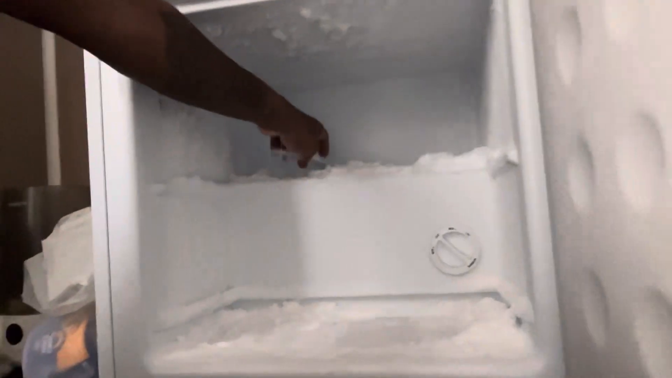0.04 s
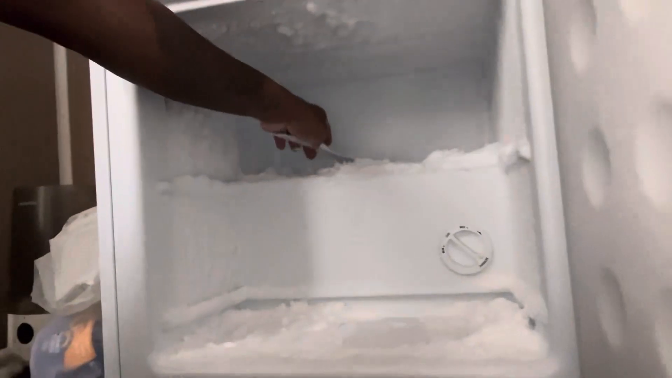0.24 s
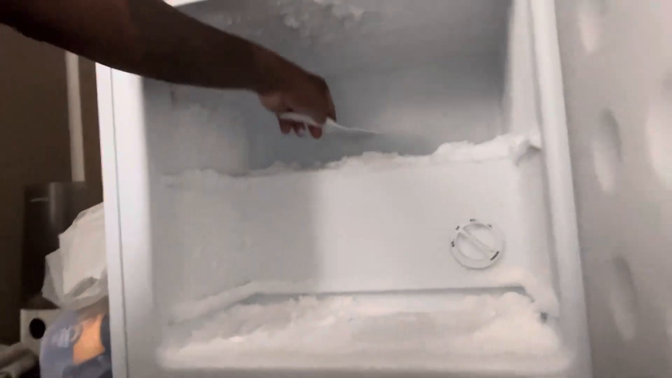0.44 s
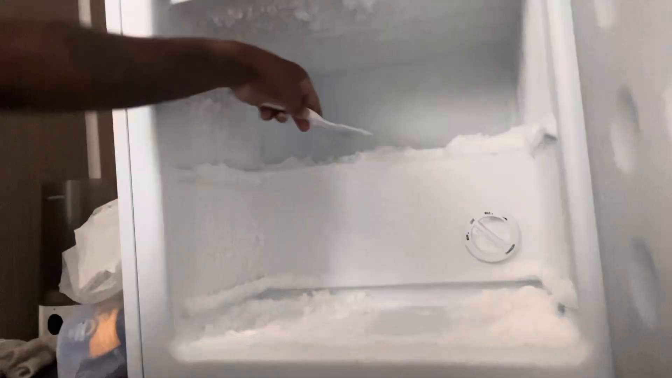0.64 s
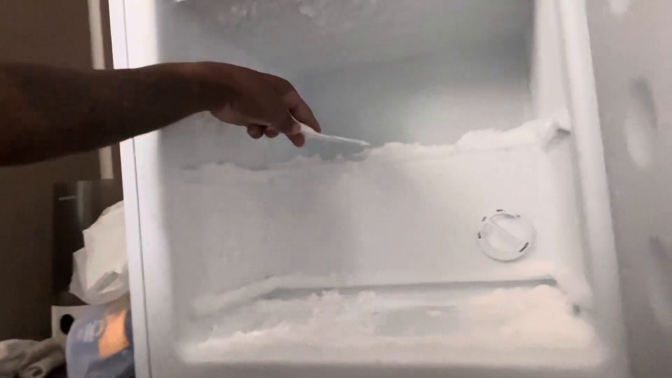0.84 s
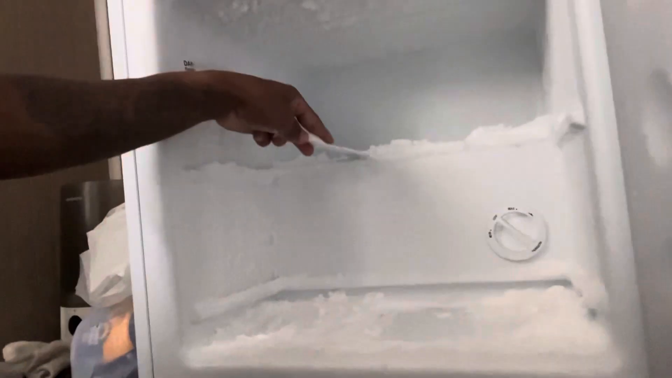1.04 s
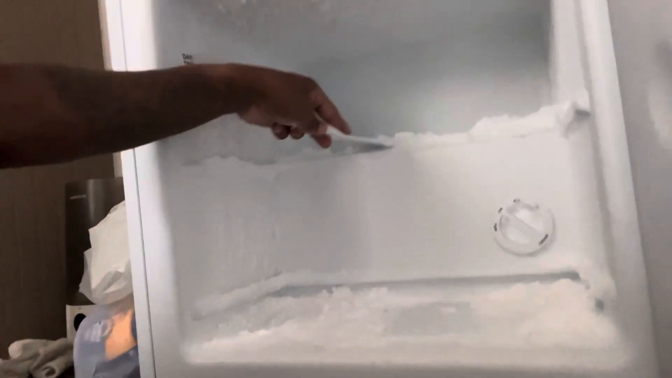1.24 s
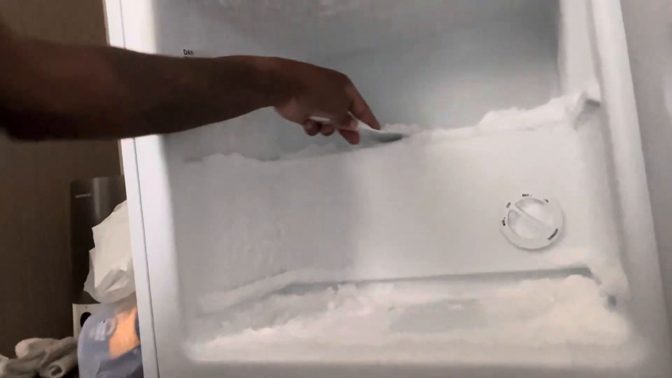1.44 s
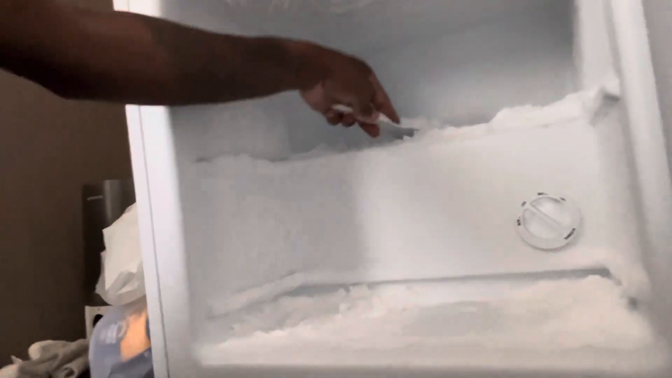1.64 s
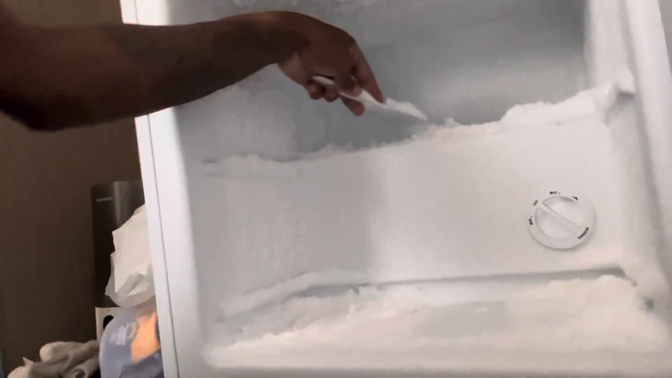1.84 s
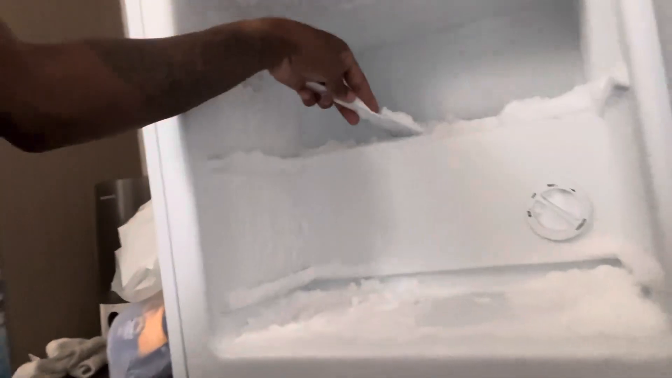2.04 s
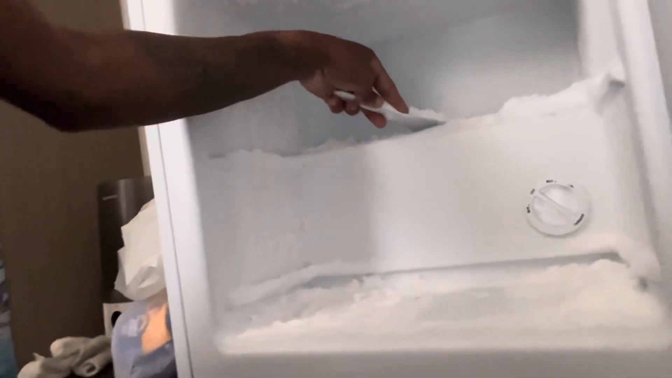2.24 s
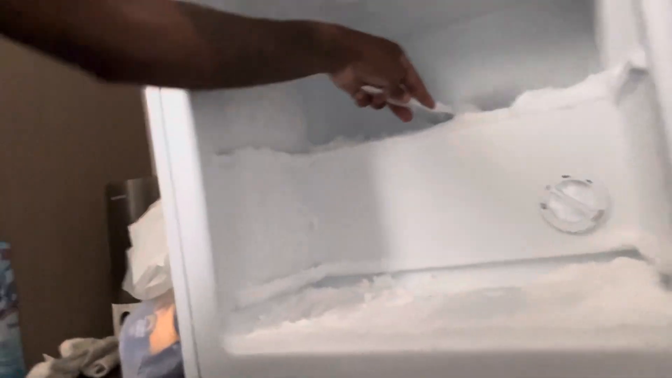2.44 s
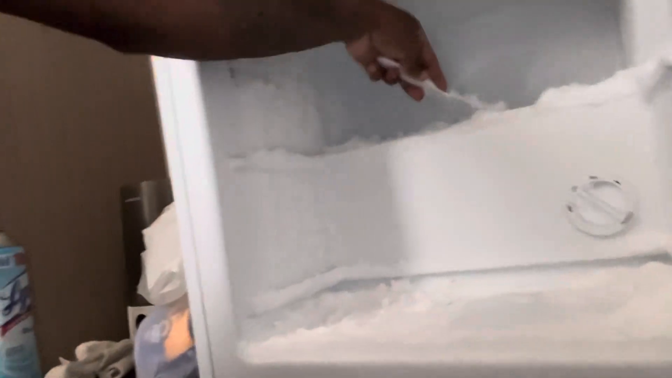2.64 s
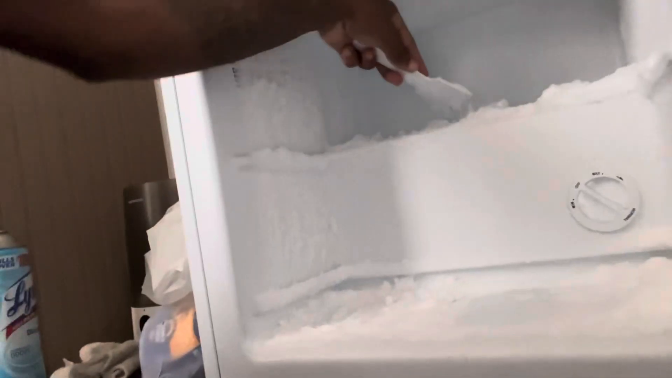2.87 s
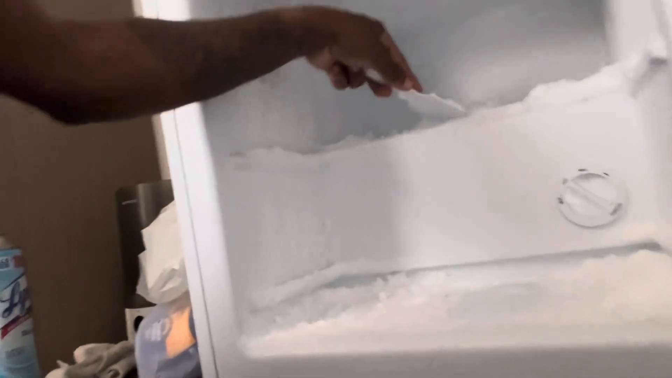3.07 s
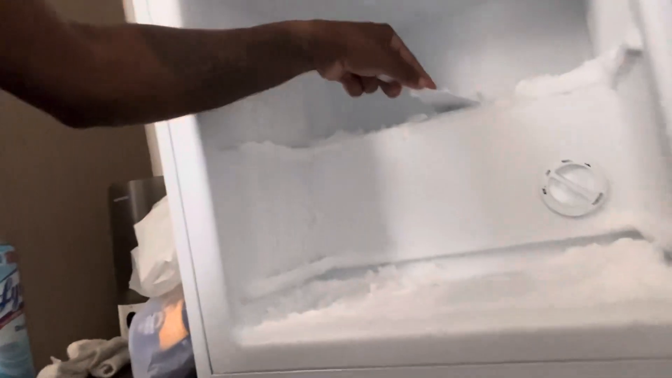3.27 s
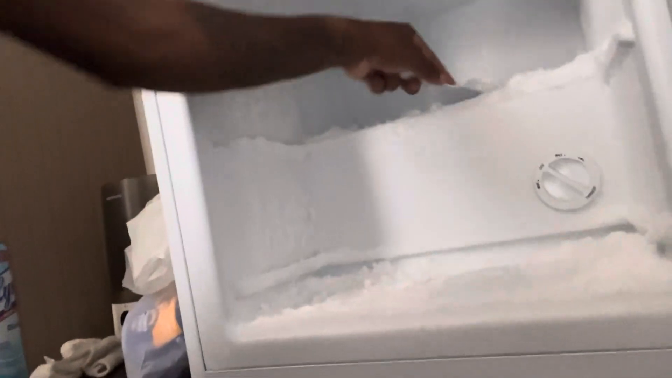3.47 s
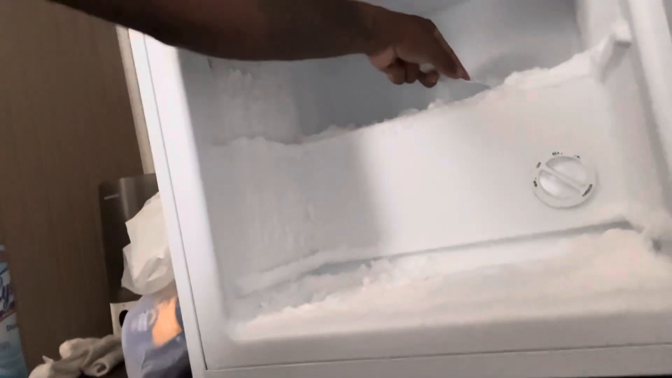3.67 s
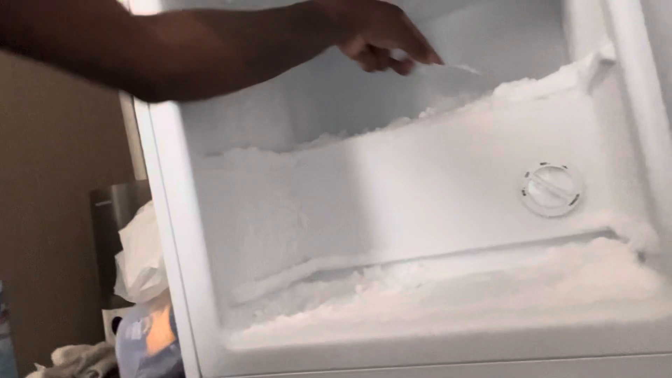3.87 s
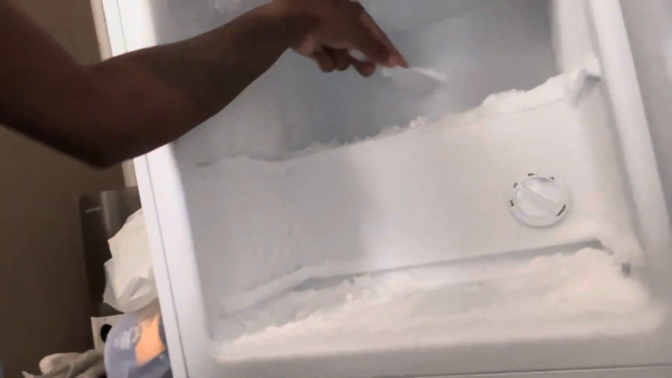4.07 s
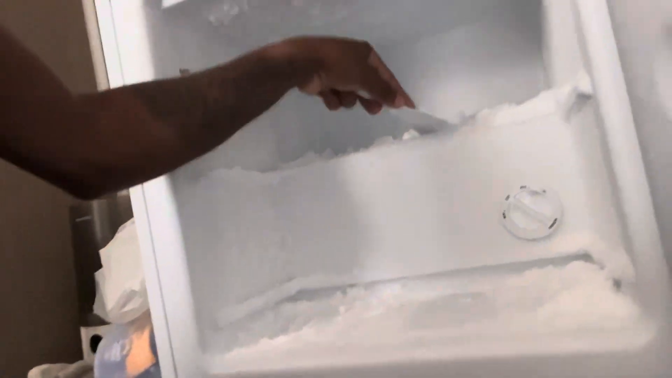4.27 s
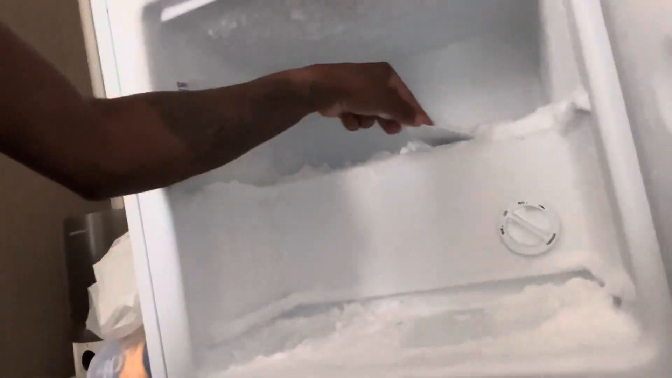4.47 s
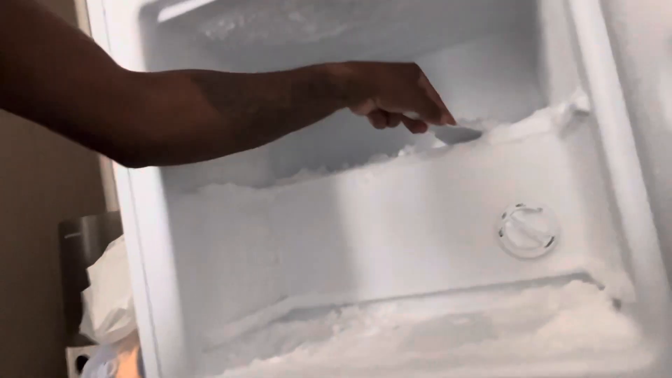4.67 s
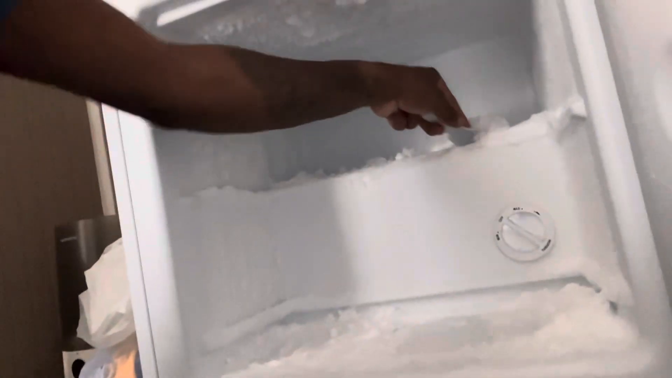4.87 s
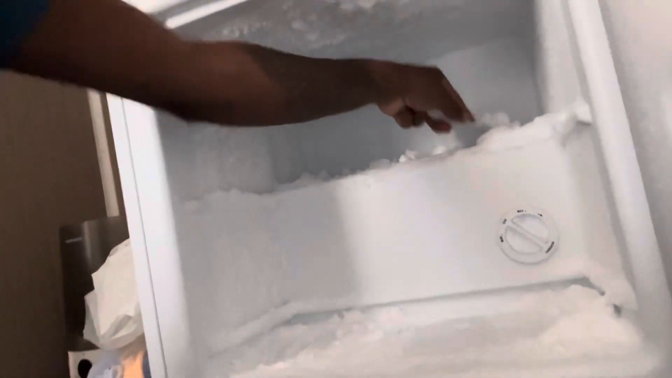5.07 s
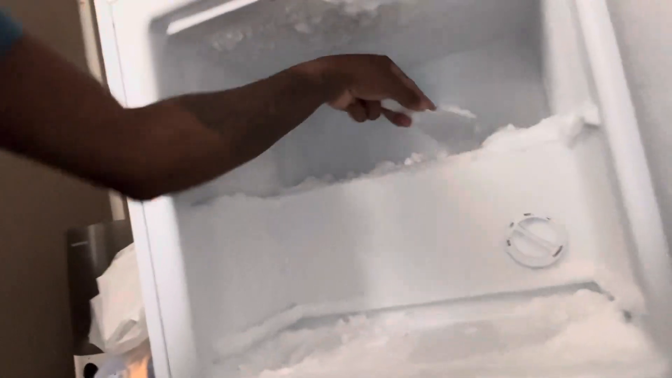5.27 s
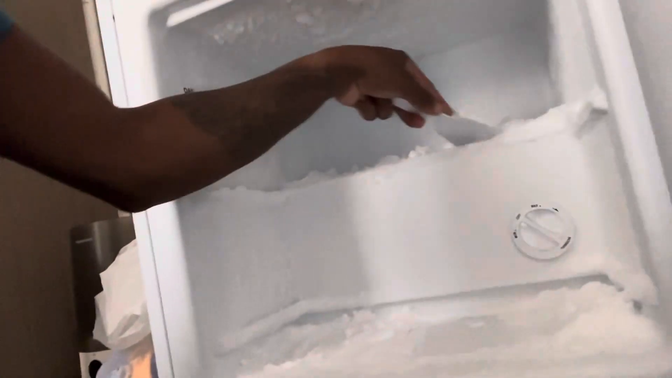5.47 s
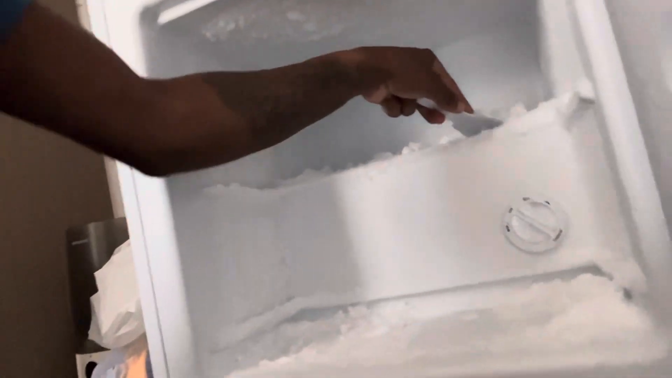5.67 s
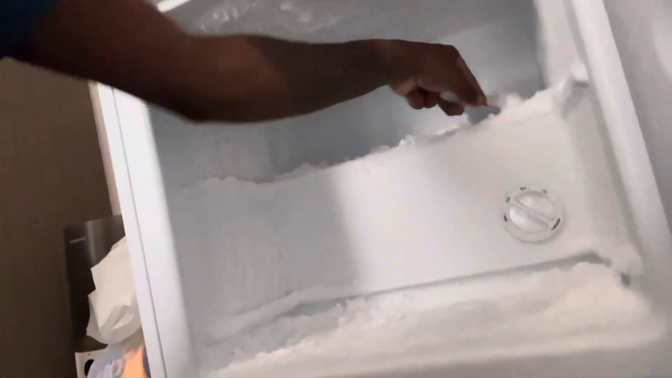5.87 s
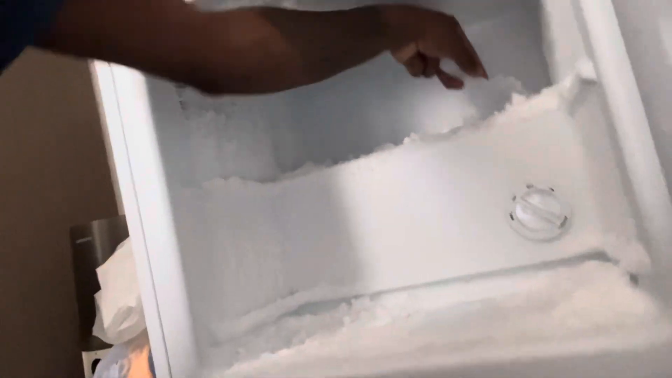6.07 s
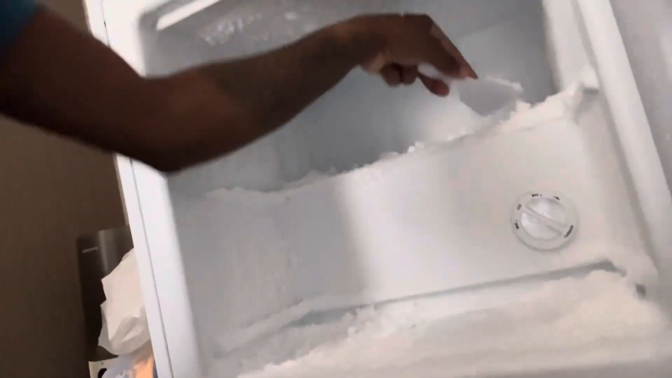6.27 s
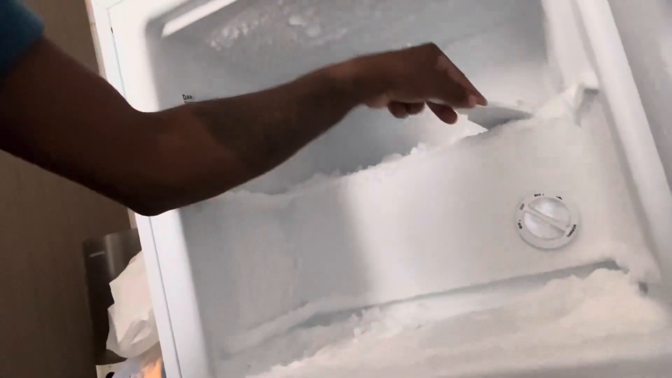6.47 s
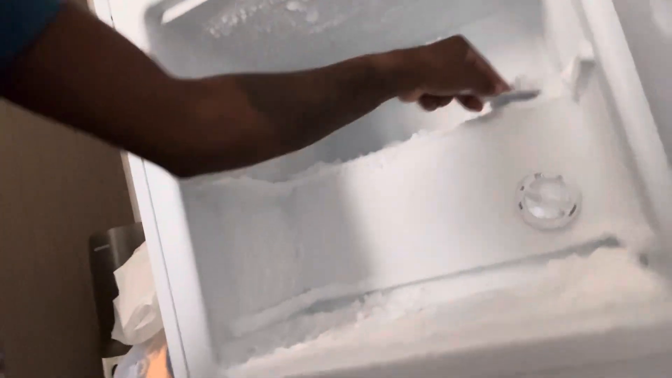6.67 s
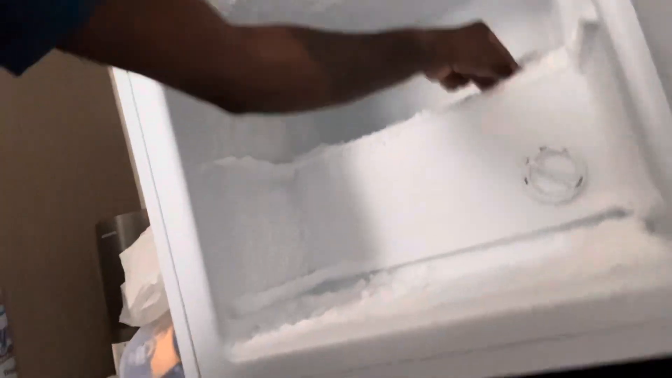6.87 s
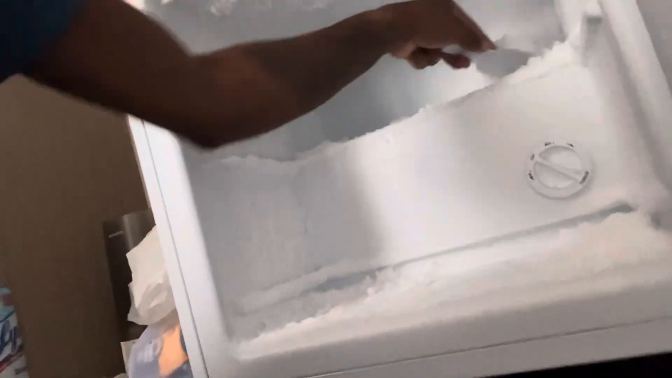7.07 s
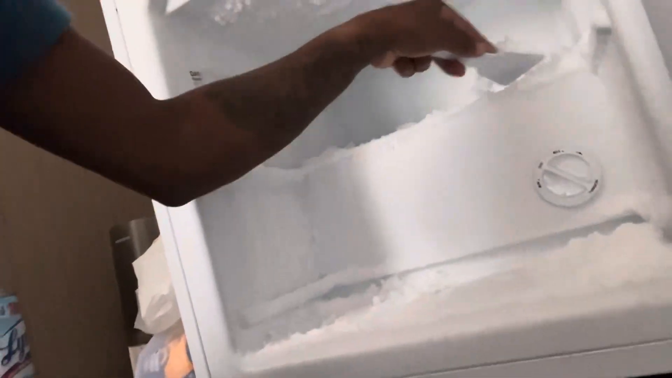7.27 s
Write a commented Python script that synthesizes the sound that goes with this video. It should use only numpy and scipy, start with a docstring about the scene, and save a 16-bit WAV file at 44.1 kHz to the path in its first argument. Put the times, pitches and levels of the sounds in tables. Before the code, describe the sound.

For the first second there is only a quiet room: low compressor hum, soft airy tone, faint rustle and tiny ticks of settling frost. At 1.0 s a plastic scraper lands, and near 1.2 s a loud knock and sharp ice crack stand out, followed by a gritty scrape to 1.6 s with a soft low rebound. A fuller crunching stroke runs 2.0-2.5 s, another 3.1-3.65 s, swelling in the middle and ending in a dull thump. A brief scratch at 4.2 s leads straight into the longest, rougher scrape, 4.3-5.0 s. After a rustling pause, another crunch runs 5.4-5.9 s with snapping lumps, small dull bumps come around 6.1 s, and a brighter, hissier scrape fills 6.4-6.85 s. Crumbs patter, and a short scratch comes at 7.3 s. Close stereo, hollow thin-walled resonance, short boxy echoes.

```python
"""First a compressor hums in a quiet room, with faint rustles and ticks of settling frost.
Then a small plastic scraper ploughs thick frost off the wall of an open freezer in slow strokes.
Random clicks stand for the snapping ice crystals: they ring the wall liner and crackle through the blade.
Knocks, thumps and short echoes in the cold box join in. Two microphones listen at the door.
The hum is a set of wavering tones; the room tone and the rustle are filtered noise and clicks."""
import sys
import numpy as np
from scipy import signal
from scipy.fft import rfft, irfft, next_fast_len
from scipy.io import wavfile
from scipy.ndimage import uniform_filter1d

SR = 44100
rng = np.random.default_rng(int(sys.argv[2]) if len(sys.argv) > 2 else 0)


def int16_out(signal):
    """Quantize to a 16-bit WAV file."""
    q = np.round(np.clip(np.atleast_2d(signal).T, -1, 1) * 32767)
    wavfile.write(sys.argv[1], SR, q.astype(np.int16))


def magnitude_from_level(level_db):
    """Linear magnitude for a level in decibels (20 dB per decade)."""
    exponent = np.asarray(level_db, float) / 20
    return 10 ** exponent


N = 322303

# colour of the room tone: (frequency [Hz], relative level [dB per Hz])
AIR_COLOUR = [(15, -52.5), (25, -22), (54, 2), (92, -10.5), (107, -14), (181, -8.5), (205, -18.5),
              (239, -10), (384, -17), (470, -16), (506, -23.5), (684, -21), (1100, -32.5), (2780, -42),
              (6000, -55), (10000, -64.5), (13000, -99), (22000, -120)]
# side signal of the room tone against its middle: (frequency [Hz], gain [dB])
AIR_SIDE = [(60, -15), (150, -15.5), (380, -11.5), (950, 3.5), (2380, -2), (5980, 0), (15000, -14)]
AIR_DB, AIR_DB_PER_S = -44.5, -0.35  # the room tone sinks slowly
# compressor tones: (frequency [Hz], level before wavering [dB rms])
HUM = [(59, -64), (118, -54.5), (177, -63), (236, -60.5), (305, -69.5), (472, -62)]
# colour of loose frost and sleeve rustle: (frequency [Hz], gain [dB])
RUSTLE_COLOUR = [(1000, -31.5), (2500, -9), (3850, -10.5), (4050, 0), (4250, -10.5), (6350, -19),
                 (6500, -4), (6650, -25.5), (10000, -37.5)]
RUSTLE_DB = -63.5
# the rustle swells: (start [s], length [s], level over the steady rustle [dB])
SWELLS = [(.02, 0.23, 10), (.3, .2, 2.5), (.62, .3, 2), (1.755, .12, 12.5), (2.72, .1, 8), (2.93, .08, 8),
          (5.082, 0.41, 11), (6.981, 0.15, 11)]
# tiny ticks of settling frost: (time [s], strength [dB], pitch [Hz])
TICKS = [(0.1494, -57, 3320), (0.4744, -61, 3460), (0.637, -56, 3000), (0.7183, -58, 2990),
         (2.7856, -57, 2500), (5.2954, -60, 3470), (5.3592, -59, 2880)]
# partials of a tick: (multiple of the pitch [ratio], level [dB])
TICK_PARTIALS = [(1, 0), (1.55, -4), (2.2, -17)]
FAINT_TICKS = 40  # more ticks at chance moments
FAINT_DB, FAINT_SPREAD_DB, TICK_T60 = -67.5, 3.5, 0.014  # middle strength, plus or minus; fade by 60 dB [s]

# the blade bumps the wall: (time of the peak [s], strength [dB], pitch [Hz])
KNOCKS = [(1.1907, -6, 620), (1.1765, -16, 384), (6.0998, -24, 280), (6.1178, -24, 300),
          (6.1358, -23.5, 300), (3.072, -21.5, 390)]
KNOCK_TURNS = 0.45  # swings up to the peak of a knock
# the bent wall springs back when the blade lets go: (time [s], strength [dB], start pitch [Hz])
REBOUNDS = [(1.574, -26, 256), (3.654, -24, 212), (4.964, -34, 250), (6.14, -33, 237)]
REBOUND_T60, REBOUND_SAG_PER_S = 0.21, 6.5  # fade by 60 dB [s], rate at which the pitch falls

# one list for each contact of blade and frost: (time [s], push on the liner [dB], fine hiss [dB])
STROKES = [
    [(1.01, -36, -47.5), (1.15, -28.5, -41.5), (1.168, -32, -42), (1.21, -27.5, -41), (1.278, -30.5, -44.5),
     (1.296, -34, -33), (1.345, -26.5, -28.5), (1.51, -20.5, -30.5), (1.572, -24, -37.5)],
    [(1.99, -29, -39), (2.072, -31.5, -49.5), (2.098, -24.5, -28), (2.2, -19, -26.5), (2.27, -17, -23.5),
     (2.33, -17, -28), (2.352, -21, -30), (2.375, -15.5, -30), (2.44, -21.5, -33.5), (2.458, -27.5, -40.5),
     (2.497, -27, -44.5)],
    [(2.515, -44.5, -58), (2.555, -38.5, -53)],
    [(3.07, -32.5, -49), (3.112, -41, -42), (3.182, -24, -33.5), (3.37, -14.5, -26), (3.516, -21.5, -33.5),
     (3.594, -19.5, -30), (3.657, -28, -42)],
    [(4.178, -25, -31.5), (4.2, -32, -45.5), (4.225, -39, -58), (4.27, -28.5, -32), (4.31, -26.5, -42.5)],
    [(4.33, -26.5, -33.5), (4.39, -20.5, -28.5), (4.45, -19.5, -31), (4.475, -23, -30.5),
     (4.525, -18.5, -31), (4.575, -21.5, -31), (4.61, -25, -30), (4.64, -19, -28), (4.704, -19, -31),
     (4.735, -19, -37.5), (4.775, -17.5, -31.5), (4.835, -20, -33), (4.9, -28, -34), (4.935, -26, -37.5),
     (4.971, -34.5, -45)],
    [(5.42, -31, -36), (5.464, -22.5, -38.5), (5.66, -20, -28), (5.775, -17.5, -27.5), (5.89, -24, -34),
     (5.922, -26.5, -40.5)],
    [(6.093, -31.5, -39.5), (6.135, -34, -42)],
    [(6.42, -36, -42.5), (6.445, -30, -40), (6.465, -31.5, -33), (6.634, -23.5, -26), (6.78, -21.5, -25),
     (6.85, -28.5, -37.5)],
    [(7.299, -24, -36), (7.308, -28, -39)],
]
CRUNCH_FROM_PUSH = 0.35  # the crunch lies between push and hiss: share of the push
# crunch over that blend, one for each contact: [dB]
CRUNCH_DB = [-1.5, 0.5, -6.5, 0, 3, 1, 1, -2, -0.5, -7]
# sudden drop at lift-off: (push [dB], crunch [dB], hiss [dB])
LIFT_DB = [-8.5, -9, -12.5]
TRAIL_DB_PER_S = 261  # then loose frost trails away
# wavering as the blade sticks and slips: (push [dB], crunch [dB], hiss [dB])
JUDDER_DB = [1.1, 0.8, 0.8]
JUDDER_S = 0.013
SLIPS_PER_S = 110
# the edge jumps free and jolts all layers at once: (thud [share], crunch [share], hiss [share])
SLIP_SHARE = [0.2, 0.34, .25]

# the blade lands: (time [s], strength [dB])
LANDINGS = [(1.01, -23.5), (1.985, -27), (3.066, -30), (4.175, -18.5), (4.329, -17.5), (5.418, -16.5),
            (6.091, -23.5), (6.418, -21.5)]
# lumps of ice break off: (time [s], strength [dB], liner thud over it [dB])
SNAPS = [(1.173, -17.5, 0), (1.179, -18.5, -0.5), (1.187, -9, -9), (1.197, -17, -6), (2.484, -31.5, 0),
         (2.526, -28, 0), (4.301, -33.5, -2.5), (5.514, -15, 1), (5.912, -20.5, 7), (6.864, -29, -4)]
# crumbs drop: (time [s], strength [dB])
CRUMBS = [(1.765, -52), (1.960, -54.5), (2.970, -54), (7.061, -45), (7.245, -49)]
# layers of each kind of burst, over its strength: (thud [dB], crunch [dB], hiss [dB])
LANDING_MIX = (-2.5, -6.5, -12)
LUMP_MIX = (-3.5, -8, -14.5)
CRUMB_MIX = (-14, -13, -4.5)
# fading times of a burst: (thud [s], crunch [s], hiss [s])
BURST_S = [0.0079, 0.0035, 0.0032]
# one sharp crack in each landing and lump, over its strength: (thud [dB], crunch [dB], hiss [dB])
CRACK_DB = [9.5, 3.5, -3]
CRACK_S = 0.0019  # the crack comes just after the start

# ringing of the liner wall and box: (frequency [Hz], width [Hz], level [dB])
LINER_MODES = [(210, 30, -15), (260, 20, 1.5), (376.6, 23, -7.5), (435, 41, 0.4), (494, 57, -1.5),
               (556, 45.4, 2), (633, 56, -7), (693, 38, -6.5), (865, 24, -8)]
VALLEY_HZ, VALLEY_WIDTH = 303.7, 44  # the liner is mute here, at pitch factor 1 [Hz]
THIN_WALL = signal.butter(6, 170, "high", fs=SR, output="sos")  # the liner radiates no deep bass
# the cabinet shudders: (frequency [Hz], gain [dB])
SHUDDER = [(30, -36), (50, -7.5), (90, 2), (130, -35.5), (300, -71.5)]
SHUDDER_DB = 0.5
# where the blade meets the wall, one row for each grip: (pitch factor of the liner modes [ratio],
# modes under 300 Hz [dB], modes over 600 Hz [dB], shudder [dB])
SPOTS = [(1.01, 8, 12.5, -1), (.99, -0.5, -1.5, 1), (0.963, -3, 4, -4), (0.989, 2, 0, -0.3),
         (.99, 1, 5.5, -3.5), (1.01, -0.5, -9, 1), (1.02, -3.5, -2.5, 1.5), (0.991, -2.5, 0, -2),
         (.97, 9, 7, 0.5), (.98, -1, 1.5, 0.5)]
# colour of crushed crystals through the blade, one list for each grip and angle:
# (frequency [Hz], relative level [dB per Hz])
GRIPS = [
    [(530, -18), (760, 1), (950, -9), (1150, 3), (1350, -3), (1550, 0.5), (1900, -6), (2350, -2),
     (2750, -18.5), (3900, -21), (4600, -11), (5200, -18), (7240, -19), (10000, -26)],
    [(530, -29), (900, 6), (995, -21), (1150, -0.5), (2300, -4.5), (2750, -10), (3730, -13), (4250, -8.5),
     (4600, -6), (4950, -11), (5300, -6.5), (5800, -9), (7240, -16.5), (8600, -9.5), (10000, -21)],
    [(530, -22), (900, -3.5), (1130, -3), (1280, -4), (2160, -8), (2730, -15), (2980, -12), (3840, -14.5),
     (4250, -10), (7850, -15), (10000, -21.5)],
    [(530, -34), (900, -4), (995, -21.5), (1100, 1), (1280, -9.5), (1550, -1), (1700, -9), (2130, -4.5),
     (2320, -10.5), (2900, -16), (4000, -15), (4600, -8), (5400, -16.5), (6200, -14), (7800, -16.5),
     (10000, -23)],
    [(530, -31), (800, 3.5), (1050, -8), (1470, 6), (1800, -6), (2200, -1), (2700, -16), (3100, -11),
     (3600, -27), (4400, -16), (10000, -26.5)],
    [(530, -24), (900, -1.5), (1550, 2.5), (1730, -14), (2140, -2.5), (3270, -12), (3510, -17),
     (4750, -9.5), (5150, -5.5), (5600, -13), (8860, -15.5), (10000, -21.5)],
    [(530, -30.5), (900, 2.5), (1300, -7), (2200, -4), (3000, -11), (3600, -13), (4400, -11), (5700, -11),
     (7000, -16.5), (8700, -14), (10000, -24.5)],
    [(530, -31), (900, -6), (976, 1), (1180, -6), (1450, -1.5), (1790, -11.5), (2160, -5.5), (2730, -13),
     (3200, -13), (3500, -20), (4200, -11), (5140, -16), (8860, -21.5), (10000, -27)],
    [(530, -25), (900, -11), (1130, -13), (2180, 0), (3400, -10.5), (4890, -11), (10000, -28.5)],
    [(530, -27.5), (900, 2), (1090, -7), (1300, 2), (1490, 0), (1680, -10), (2360, 0.5), (2540, -16),
     (2950, -1), (3500, -12.5), (3950, -4.5), (4200, -8.5), (4960, -4.5), (5180, -7), (5600, -3),
     (6500, -11.5), (7500, -14), (10000, -21.5)],
]
# when the next grip takes over: [s]
REGRIPS = [1.285, 1.9, 3, 4.1, 4.322, 4.725, 5.35, 6.05, 6.35]
# finest crackle: (frequency [Hz], level over the last point of the grip [dB])
TOP = [(12500, -3), (15600, 5.5), (15900, -55)]
# pitches at which the blade rings in every grip: [Hz]
BLADE_HZ = [1100, 1520, 2110, 3950, 4960]
BLADE_WIDTH, BLADE_DB = 40, 2.5  # width [Hz], boost of the crackle

# echo in the cold box, middle signal: (frequency [Hz], strength [dB])
BOX_ECHO = [(300, -14.5), (900, -7), (8000, -6)]
# echo in the room: (frequency [Hz], strength [dB])
ROOM_ECHO = [(300, -15), (2000, -16), (10000, -22)]
BOX_T60, ROOM_T60 = 0.05, 0.28  # fade by 60 dB [s]
# gain of the side signal over that of the middle: (frequency [Hz], difference [dB])
SIDE_OVER_MID = [(60, -13.5), (250, -21), (450, -15.5), (700, 3.5), (1100, -4), (2500, 0.3), (6800, 0),
                 (8200, -14.5), (11000, -10.5), (12600, -2), (13400, 30.5), (15000, 29.5), (15400, 8),
                 (16000, 5)]
# left microphone against the right: (frequency [Hz], difference [dB])
LEFT_OVER_RIGHT = [(100, -1.5), (330, -0.1), (640, -6.5), (1200, -0.5), (2500, 3), (6400, 2.5),
                   (9500, -1.4)]


def evened(x):
    """Scales to rms 1."""
    return x / np.sqrt(np.mean(x ** 2) + 1e-20)


def wandering(width):
    """Slow random wavering of rms 1: noise smoothed twice over a width in samples."""
    return evened(uniform_filter1d(uniform_filter1d(rng.standard_normal(N), width), width))


def read(points, hz):
    """Joins (frequency [Hz], value) points on a log axis."""
    f, value = np.transpose(points)
    return np.interp(np.log(hz + 1), np.log(f + 1), value)


def shaped(x, points):
    """Filters by a (frequency [Hz], gain [dB]) table."""
    size = next_fast_len(N + 4096)
    gain = magnitude_from_level(read(points, np.fft.rfftfreq(size, 1 / SR)))
    return irfft(rfft(x, size) * gain, size)[..., :N]


def uneven(x, patchy_db):
    """The colour wanders in patches some 300 Hz wide and 60 ms long."""
    z = signal.stft(x, nperseg=512, noverlap=384)[2]
    noise = rng.standard_normal(z.shape)
    patches = evened(uniform_filter1d(uniform_filter1d(noise, 3, 0), 20, 1))
    gain = magnitude_from_level(patchy_db * patches - 0.115 * patchy_db ** 2)  # the last term holds the mean power
    return signal.istft(z * gain, nperseg=512, noverlap=384)[1][:N]


def crystals(per_s, spread_db, clump_db, clump_s):
    """Snapping crystals: random clicks, most small and a few large, that grow and shrink in clumps."""
    size = magnitude_from_level(spread_db * np.minimum(rng.exponential(1, N), 4)) * rng.choice([-1., 1.], N)
    clicks = size * (rng.random(N) < per_s / SR)
    return evened(clicks * magnitude_from_level(clump_db * wandering(int(clump_s * SR))))


def air():
    """Room tone: patchy low noise that sinks slowly, as middle and side signals."""
    mid, side = shaped(rng.standard_normal((2, N)), AIR_COLOUR)
    level = magnitude_from_level(AIR_DB + AIR_DB_PER_S * np.arange(N) / SR) / mid.std()
    return level * np.array([uneven(mid, patchy_db=1.9), uneven(shaped(side, AIR_SIDE), patchy_db=1.0)])


def hum():
    """The compressor: steady tones whose level and phase waver together."""
    out, t = np.zeros(N), np.arange(N) / SR
    for hz, db in HUM:
        waver = wandering(3000)
        phase = 2 * np.pi * (hz * t + rng.random()) + 0.4 * waver
        out += np.sqrt(2) * magnitude_from_level(db + 2.65 * waver) * np.sin(phase)
    return out


def rustle():
    """Loose frost and sleeve: faint clumped clicks that swell at times."""
    t = np.arange(N) / SR
    swell_db = sum(db * np.sin(np.pi * np.clip((t - s) / length, 0, 1) ** 0.5) for s, length, db in SWELLS)
    grains = np.array([crystals(4000, 2.5, 3.6, 0.056), crystals(4000, 1.8, 4, 0.05)])
    return magnitude_from_level(RUSTLE_DB + swell_db) * shaped(grains, RUSTLE_COLOUR)


def ticks():
    """Settling frost: short pings, listed or by chance, each on the left or the right only."""
    out, t = np.zeros((2, N)), np.arange(2000) / SR
    faint = [(N / SR * when, FAINT_DB + FAINT_SPREAD_DB * (2 * size - 1), 1800 * 2.1 ** pitch)
             for when, size, pitch in rng.random((FAINT_TICKS, 3))]
    for s, db, hz in TICKS + faint:
        tone = sum(magnitude_from_level(d) * np.sin(2 * np.pi * k * hz * t) for k, d in TICK_PARTIALS)
        ping = magnitude_from_level(db - 60 * t / TICK_T60) * tone
        part = out[:, round(s * SR):][:, :len(t)]
        part += np.c_[[1, rng.choice([-1., 1.])]] * ping[:part.shape[1]]
    return out


def room_tone():
    """Air, rustle and ticks on both sides, with the hum in the middle."""
    out = air() + rustle() + ticks()
    out[0] += hum()
    return out


def knocks():
    """The blade bumps the wall: dull blows of one or two swings."""
    out, t = np.zeros(N), np.arange(SR // 40) / SR
    for s, db, hz in KNOCKS:
        u = t * hz / KNOCK_TURNS  # 1 at the peak
        blow = magnitude_from_level(db) * u * np.exp(1 - u) * np.cos(2 * np.pi * (hz * t - KNOCK_TURNS))
        out[round((s - KNOCK_TURNS / hz) * SR):][:len(t)] += blow
    return out


def rebounds():
    """The wall springs back: low thumps that start softly and fall in pitch."""
    out, t = np.zeros(N), np.arange(SR // 4) / SR
    for s, db, hz in REBOUNDS:
        turns = np.cumsum(hz * np.exp(-REBOUND_SAG_PER_S * t)) / SR
        level = np.minimum(t / 0.0068, 1) * magnitude_from_level(db - 60 * t / REBOUND_T60)
        out[round(s * SR):][:len(t)] += level * np.sin(2 * np.pi * turns)
    return out


def cracks():
    """Ice cracks: one click in thud, crunch and hiss for every landing and lump."""
    out = np.zeros((3, N))
    for s, db, thud_db in SNAPS + [(s, db, 0) for s, db in LANDINGS]:
        out[:, round((s + CRACK_S) * SR)] = magnitude_from_level(db + np.add(CRACK_DB, (thud_db, 0, 0)))
    return out


def contact(t):
    """Force on thud, crunch and hiss: strokes with their lift-off, and a short burst for every
    landing, lump and crumb."""
    force = np.zeros((3, N))
    for rows, over_db in zip(STROKES, CRUNCH_DB):
        s, push_db, hiss_db = np.transpose(rows)
        crunch_db = CRUNCH_FROM_PUSH * push_db + (1 - CRUNCH_FROM_PUSH) * hiss_db + over_db
        level_db = np.array([np.interp(t, s, db) for db in (push_db, crunch_db, hiss_db)])
        lifted = np.maximum(t - s[-1], 0)  # seconds since lift-off
        level_db += (lifted > 0) * (np.c_[LIFT_DB] - TRAIL_DB_PER_S * lifted)
        force = np.maximum(force, (t >= s[0]) * magnitude_from_level(level_db))
    force *= magnitude_from_level(np.c_[JUDDER_DB] * wandering(int(JUDDER_S * SR)))
    bursts = [(s, db + np.array(LANDING_MIX)) for s, db in LANDINGS]
    bursts += [(s, db + np.array(CRUMB_MIX)) for s, db in CRUMBS]
    bursts += [(s, db + np.add(LUMP_MIX, (thud_db, 0, 0))) for s, db, thud_db in SNAPS]
    for s, layers_db in bursts:
        fade = (t >= s) * np.exp(-np.abs(t - s) / np.c_[BURST_S])
        force = np.hypot(force, fade * magnitude_from_level(np.c_[layers_db]))
    return signal.lfilter([0.012], [1, -0.988], force)  # contact builds in 2 ms


def liner(pitch, low_db, high_db):
    """Ringing of the thin wall at one spot: a sum of damped modes with a mute valley, of energy 1."""
    t, out = np.arange(4096) / SR, np.zeros(4096)
    for f, width, db in LINER_MODES:
        mode_db = db + low_db * (f < 300) + high_db * (f > 600)
        out += magnitude_from_level(mode_db) * width * np.exp(-np.pi * width * t) * np.sin(2 * np.pi * f * pitch * t)
    out = signal.sosfilt(THIN_WALL, out)
    out = signal.lfilter(*signal.iirnotch(VALLEY_HZ * pitch, VALLEY_HZ / VALLEY_WIDTH, SR), out)
    return out / np.linalg.norm(out)


def causal(gain):
    """Response with this gain whose energy comes as early as possible; energy 1."""
    log_gain = np.log(np.r_[gain, gain[-2:0:-1]] + 1e-5)
    taps = np.fft.ifft(np.exp(np.conj(signal.hilbert(log_gain)))).real[:len(gain)]
    return taps / np.linalg.norm(taps)


def scraping():
    """The strokes set how hard crystals snap: thuds ring the liner, crunch and hiss take the grip's colour."""
    t = np.arange(N) / SR
    grains = [crystals(2000, 2.13, 0.76, 0.0083), crystals(2600, 2.5, 0.94, 0.011),
              crystals(5000, 1.96, 1.3, 0.004)]
    slips = np.c_[SLIP_SHARE] * crystals(SLIPS_PER_S, 1.8, 0.7, 0.027)
    thud, crunch, hiss = contact(t) * (grains + slips) + cracks()
    hz = np.fft.rfftfreq(4096, 1 / SR)
    fine = 1 / (1 + (3500 / (hz + 1)) ** 8)  # share of power that belongs to the hiss
    blade_db = sum(BLADE_DB / (1 + (2 * (hz - f) / BLADE_WIDTH) ** 2) for f in BLADE_HZ)
    grip_now = np.searchsorted(REGRIPS, t)
    out = magnitude_from_level(SHUDDER_DB) * shaped(thud * magnitude_from_level(np.array(SPOTS)[grip_now, 3]), SHUDDER)
    crackle = np.zeros(N)
    for k, (grip, (pitch, low_db, high_db, _)) in enumerate(zip(GRIPS, SPOTS)):
        active = grip_now == k
        out += signal.oaconvolve(thud * active, liner(pitch, low_db, high_db))[:N]
        points = grip + [(f, grip[-1][1] + db) for f, db in TOP]
        colour = magnitude_from_level(read(points, hz) + blade_db)
        for drive, share in ((crunch, 1 - fine), (hiss, fine)):
            crackle += signal.oaconvolve(drive * active, causal(colour * np.sqrt(share)))[:N]
    return out + uneven(crackle, patchy_db=3.0)


def echoes(t60):
    """Two patterns of sparse taps of random sign, one in every 10 samples, dying away; energy 1."""
    length = int(t60 * SR)
    taps = np.zeros((2, length))
    starts = np.arange(40, length - 10, 10)
    places = starts + rng.integers(0, 10, (2, len(starts)))
    np.put_along_axis(taps, places, rng.choice([-1., 1.], places.shape), 1)
    taps *= magnitude_from_level(-60 * np.arange(length) / length)
    return taps / np.linalg.norm(taps, axis=1, keepdims=True)


def box(x):
    """Echoes of box and room: the blade moves along the wall, so three box patterns take turns."""
    turn = np.pi * 4 * np.arange(N) / SR
    near = np.zeros((2, N))
    for k in range(3):
        share = np.sqrt(2 / 3) * np.cos(turn + k * np.pi / 3)
        near += signal.oaconvolve((x * share)[None], echoes(BOX_T60), axes=1)[:, :N]
    far = signal.oaconvolve(x[None], echoes(ROOM_T60), axes=1)[:, :N]
    direct = np.array([x, np.roll(x, 5) * 0.25])  # middle, and a weaker, slightly later side
    return direct + np.array([shaped(near[0], BOX_ECHO), magnitude_from_level(2.0) * near[1]]) + shaped(far, ROOM_ECHO)


def spread(mid_side):
    """Sets how wide the sound is: shares the power between middle and side by frequency."""
    hz, db = np.transpose(SIDE_OVER_MID)
    mid_db = -10 * np.log10(1 + magnitude_from_level(2 * db))
    return np.array([shaped(mid_side[0], np.c_[hz, mid_db]), shaped(mid_side[1], np.c_[hz, mid_db + db])])


def scene():
    """Adds all sources and turns middle and side into left and right."""
    mid, side = room_tone() + spread(box(knocks() + rebounds() + scraping()))
    return np.array([mid + side, mid - side])


def top_cut(x):
    """Nothing passes above the cut-off."""
    return signal.sosfilt(signal.butter(12, 17240, fs=SR, output="sos"), x)


def record(dry):
    """The two microphones differ in colour."""
    hz, db = np.transpose(LEFT_OVER_RIGHT)
    pair = np.array([shaped(dry[0], np.c_[hz, db / 2]), shaped(dry[1], np.c_[hz, -db / 2])])
    return top_cut(pair)


dry = scene()
out = record(dry)
int16_out(out)
```